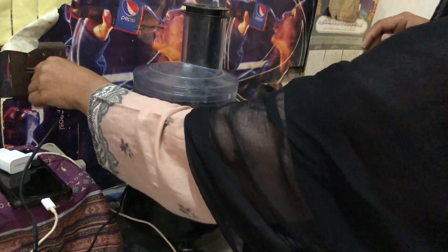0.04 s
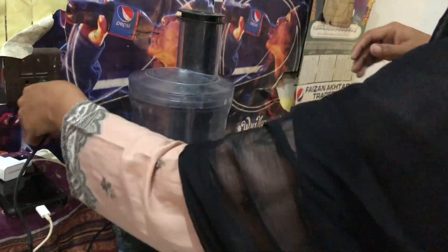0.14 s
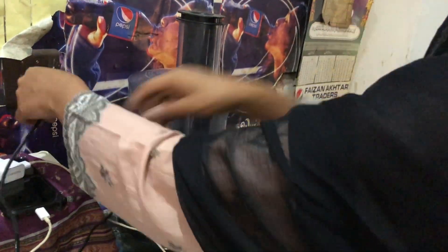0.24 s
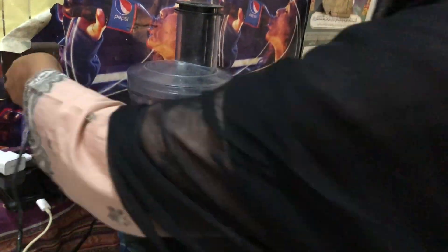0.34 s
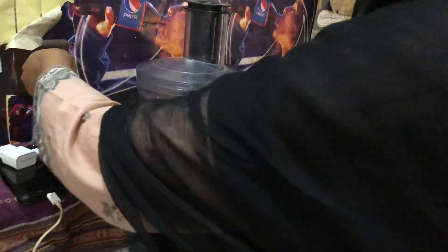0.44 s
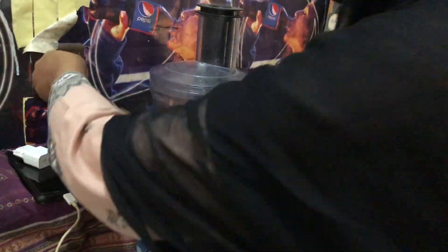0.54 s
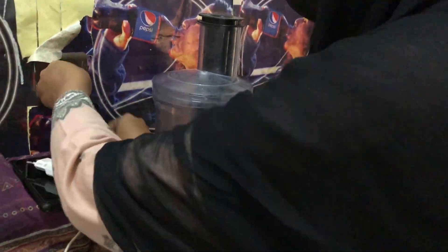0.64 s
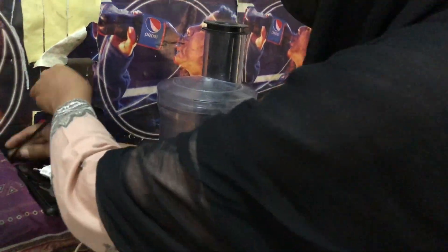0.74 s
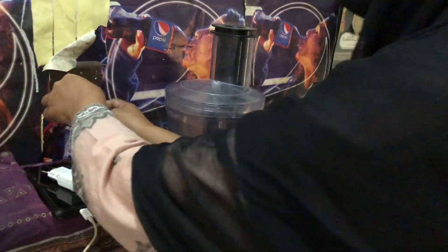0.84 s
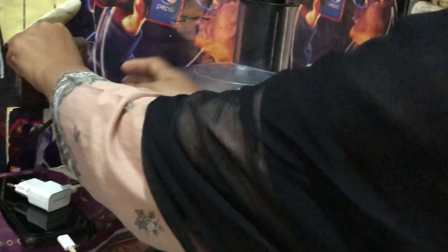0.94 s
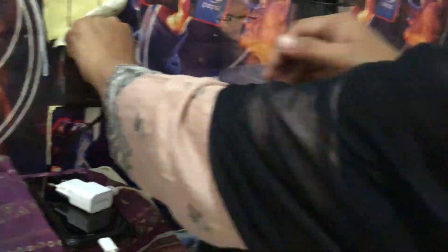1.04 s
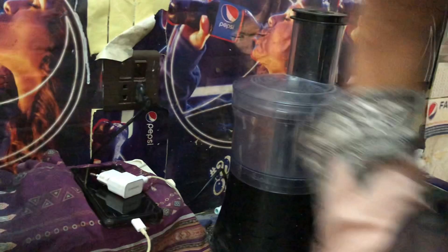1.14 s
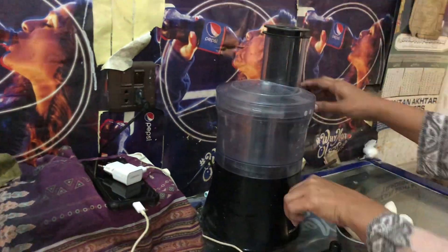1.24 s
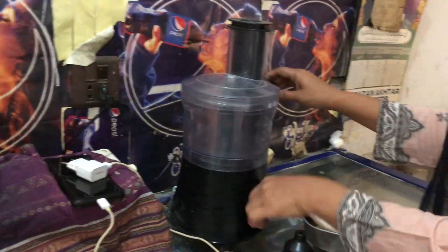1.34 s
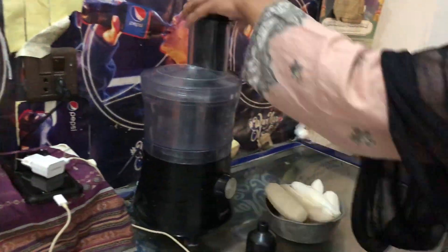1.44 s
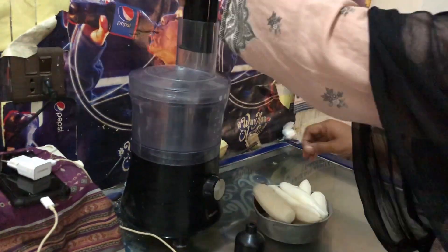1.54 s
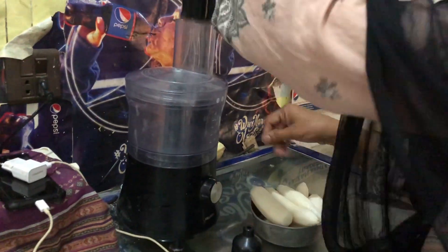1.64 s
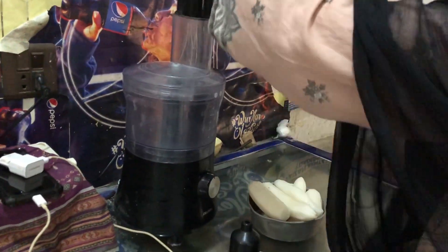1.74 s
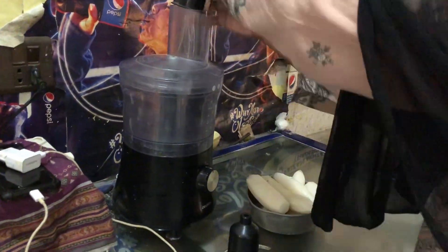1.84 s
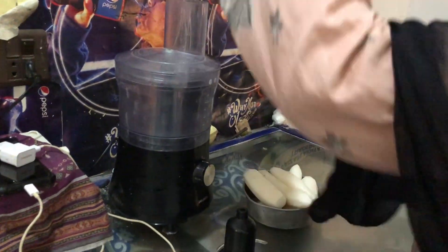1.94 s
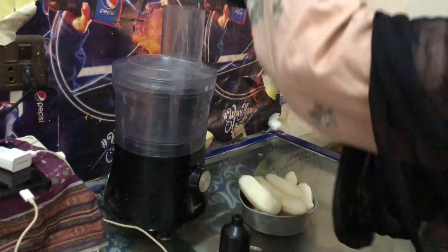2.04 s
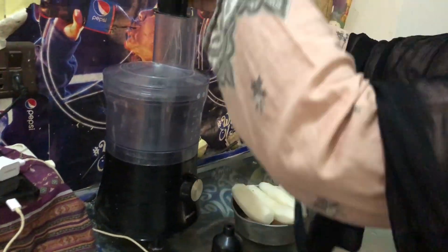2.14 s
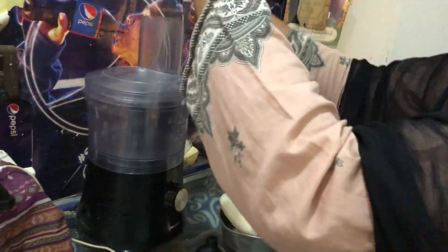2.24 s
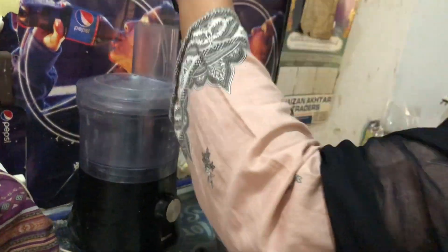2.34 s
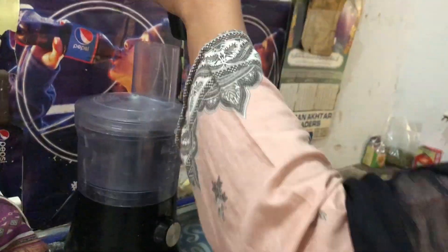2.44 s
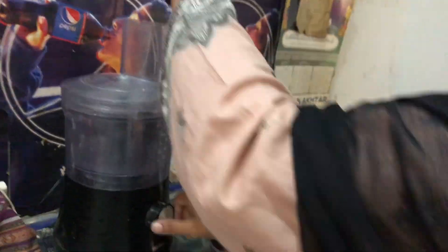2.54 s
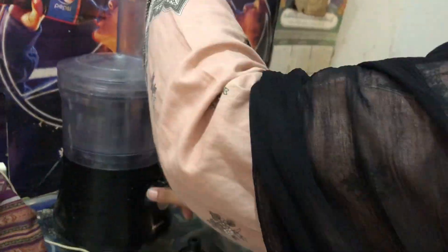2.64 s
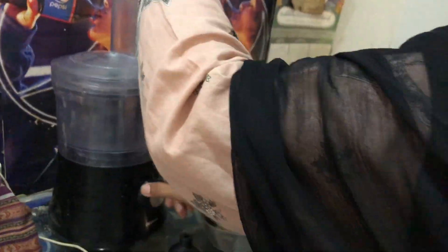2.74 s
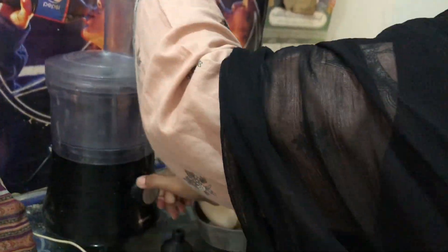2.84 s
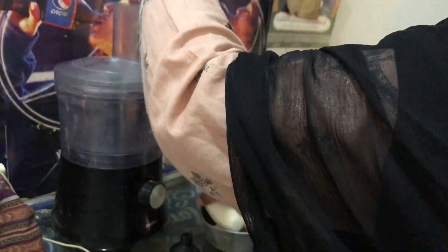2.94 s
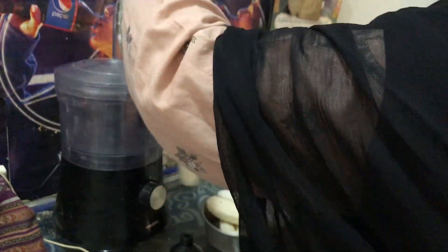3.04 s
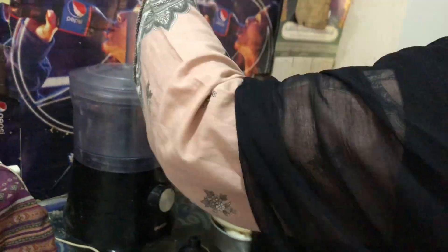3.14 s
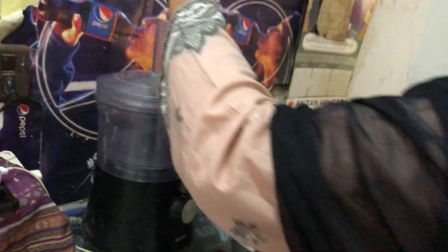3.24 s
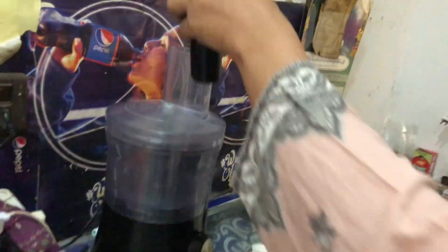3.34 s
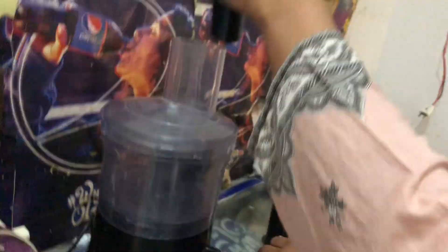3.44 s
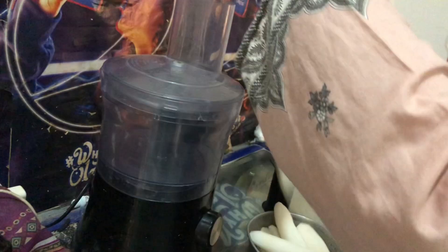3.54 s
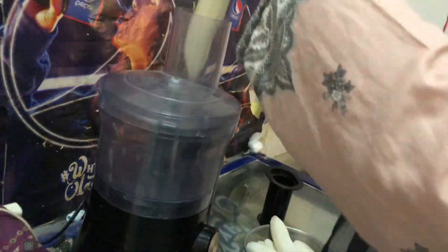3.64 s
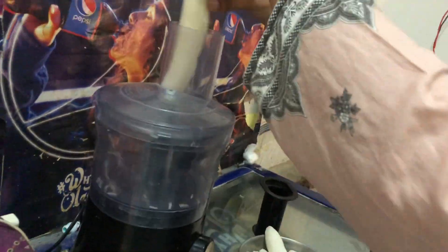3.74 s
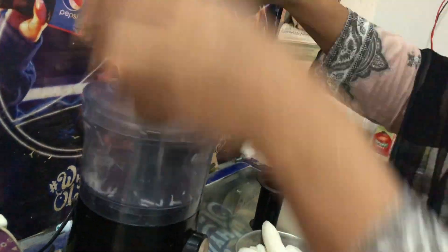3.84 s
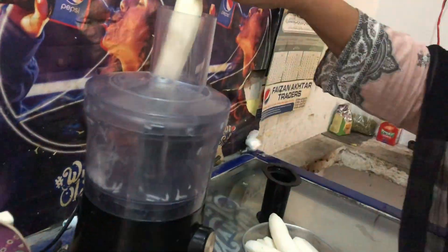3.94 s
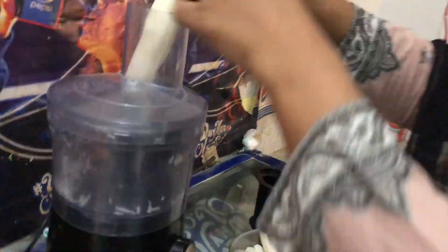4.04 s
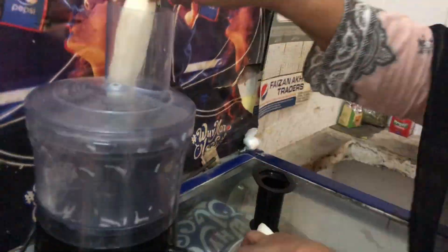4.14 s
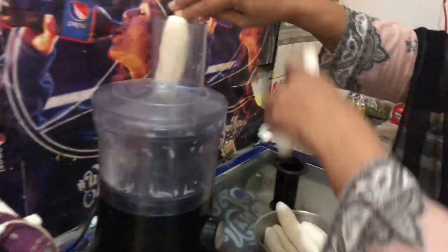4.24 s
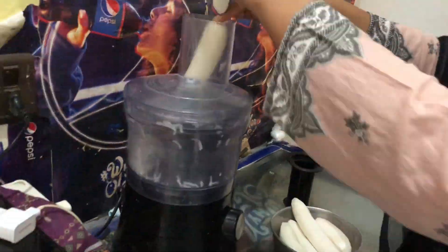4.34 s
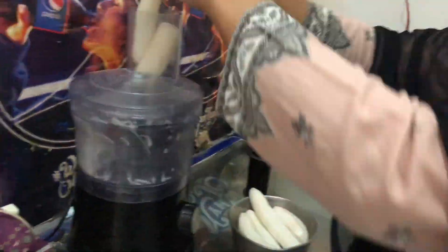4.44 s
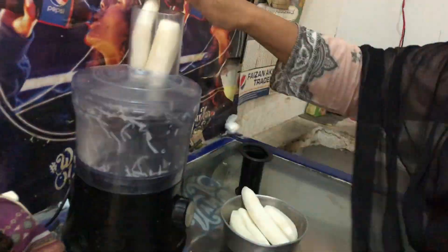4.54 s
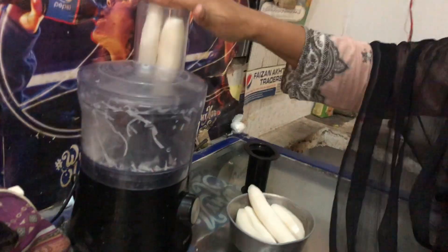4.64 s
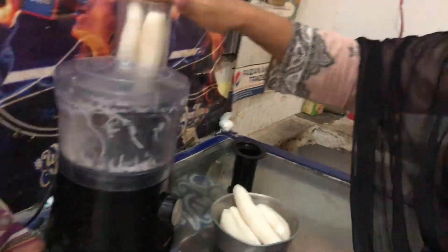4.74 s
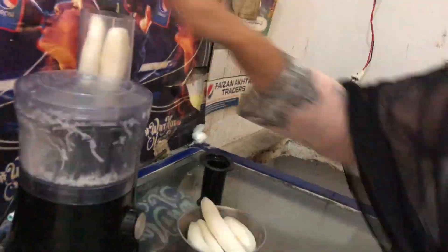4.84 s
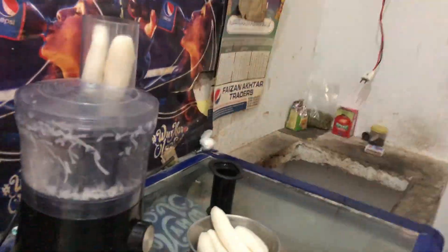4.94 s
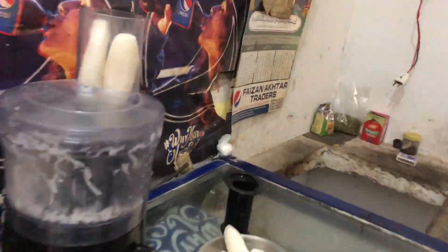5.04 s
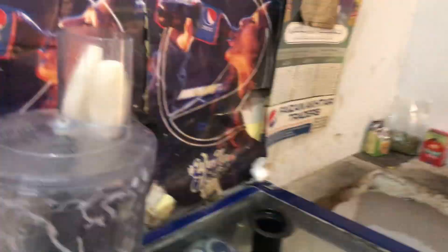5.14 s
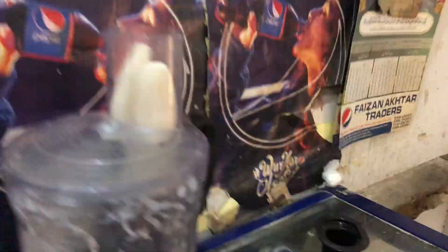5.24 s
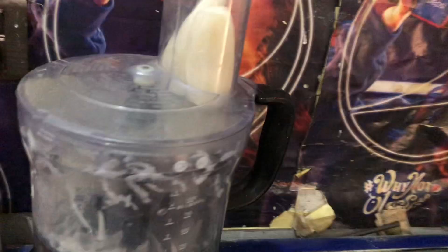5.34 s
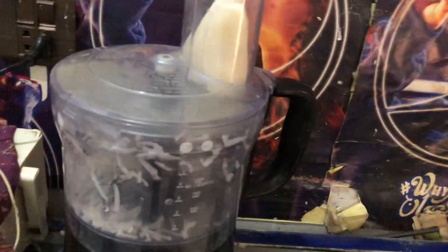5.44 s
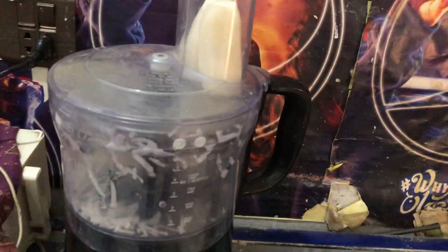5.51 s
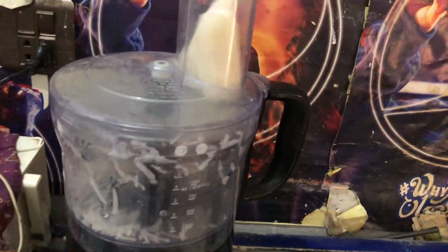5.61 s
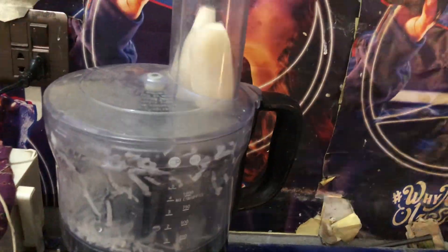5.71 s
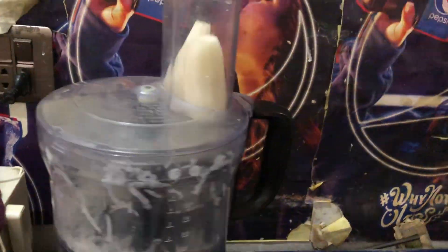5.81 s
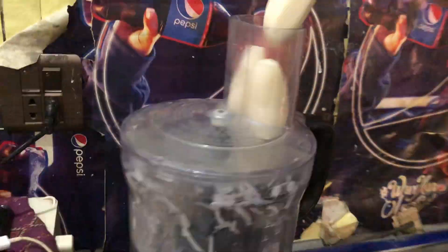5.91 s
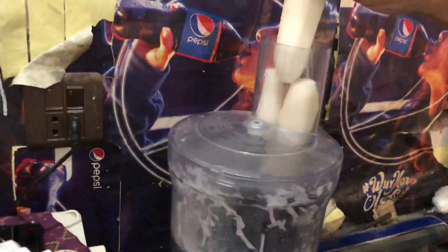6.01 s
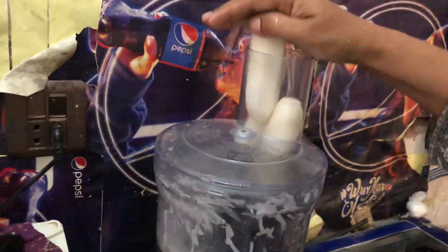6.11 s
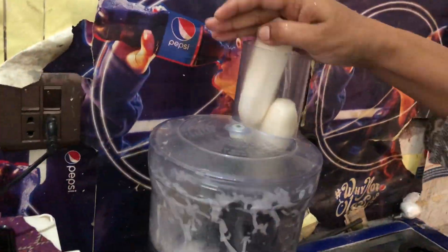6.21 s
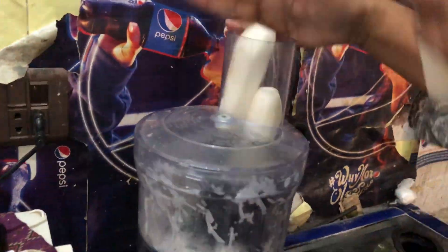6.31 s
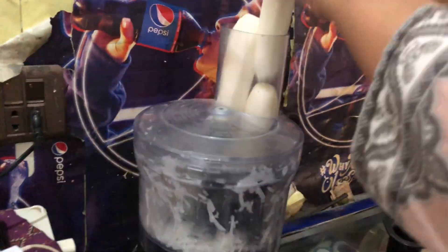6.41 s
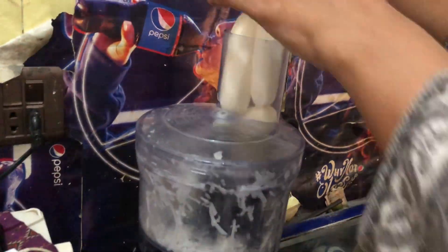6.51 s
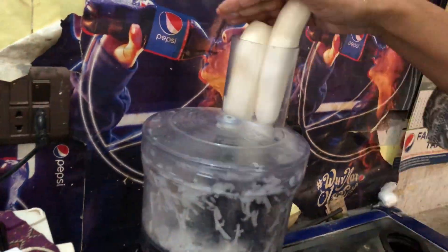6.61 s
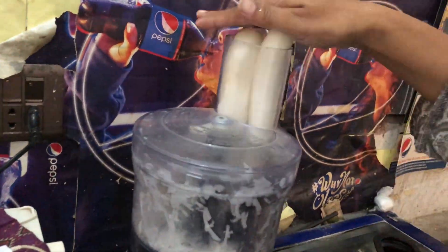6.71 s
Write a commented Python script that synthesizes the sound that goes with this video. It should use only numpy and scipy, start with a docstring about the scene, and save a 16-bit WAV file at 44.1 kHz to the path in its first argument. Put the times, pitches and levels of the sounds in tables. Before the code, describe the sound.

A hand-held microphone near the counter picks up light plastic clicks and fumbling, one quick pulse of an electric motor, and a busy cluster of sharp plastic knocks with hollow tube rubs. Just before three seconds the motor switches on for good, buzzing and hissing steadily; vegetables thump and squeak on the disc, then a rough hollow grating swells with each push, the tone turning brighter later.

```python
"""A food processor on a kitchen counter, heard from close by over the soft hiss of a quiet kitchen.
A plug clicks into its socket, the motor is pulsed once and coasts down, then the plastic pusher slides out
of the feed tube and is put down: noise bursts ring the plastic and the air in the tube.
The motor runs on to the end, with brush noise hissing and tones on multiples of its rotation whining,
while radishes knock, squeak and are shredded by the disc: grainy noise in the resonances of the bowl."""
import sys
import numpy as np
from scipy import signal
from scipy.fft import rfft, irfft, next_fast_len
from scipy.io import wavfile

SR = 44100
rng = np.random.default_rng(int(sys.argv[2]) if len(sys.argv) > 2 else 0)


def wrap_up_sound(samples):
    """Save the sound to the file named by the first command line argument, as 16-bit audio."""
    columns = np.atleast_2d(samples).T
    # keep every value between -1 and 1, then stretch to whole-number steps
    tamed = np.clip(columns, -1, 1)
    steps = np.round(tamed * 32767).astype(np.int16)
    wavfile.write(sys.argv[1], SR, steps)


N = 298557
TIME = np.arange(N) / SR
PADDED = next_fast_len(N + SR // 2)
BINS = np.maximum(np.fft.rfftfreq(PADDED, 1 / SR), 1)


def from_db(db):
    """Decibels to gain."""
    return 10 ** (np.asarray(db) / 20)


def rms_one(x):
    """Scale to rms 1."""
    return x / np.sqrt(np.mean(x ** 2) + 1e-20)


def in_time(rows):
    """Second column of a table, interpolated over time."""
    s, value = np.transpose(rows)
    return np.interp(TIME, s, value)


def since(s):
    """Seconds gone by since a moment, 0 before it."""
    return np.maximum(TIME - s, 0)


def held(start, end, attack_s, release_s, shape=1):
    """Attack, hold, release; a shape above 1 lingers, then drops faster."""
    attack = 1 - np.exp(-since(start) / attack_s)
    return attack * np.exp(-(since(end) / release_s) ** shape)


def swell(length, edge):
    """A stroke with rounded ends; edge is the share of it that is rounded."""
    return signal.windows.tukey(max(int(length * SR), 8), edge)


def add(out, s, sound):
    """Mix a sound in at a time."""
    i = max(round(s * SR), 0)
    out[i:i + len(sound)] += sound[:N - i]


def white():
    """Fresh white noise."""
    return rng.standard_normal(N)


def drift(rate):
    """Random wander with rms 1, through a fresh value rate times a second."""
    knots = rng.standard_normal(4096)
    return rms_one(np.interp(TIME * rate, np.arange(len(knots)), knots))


def grains(per_s, spread_db):
    """Random tiny impacts of uneven size; rms 1."""
    struck = rng.random(N) < per_s / SR
    sign = rng.choice([-1, 1], N)
    size = from_db(spread_db * np.minimum(rng.exponential(1, N), 4))
    return rms_one(struck * sign * size)


def band(x, low_hz, high_hz, order=2):
    """Butterworth band-pass."""
    sos = signal.butter(order, [low_hz, min(high_hz, SR / 2 - 1)], "band", fs=SR, output="sos")
    return signal.sosfilt(sos, x + 1e-18)


def coloured(x, spectrum):
    """Filter a sound by a spectrum table; rms 1."""
    hz, db = np.transpose(spectrum)
    gain = from_db(np.interp(np.log(BINS), np.log(hz), db))
    return rms_one(irfft(rfft(x, PADDED) * gain, PADDED)[:N])


def resonate(x, modes):
    """Parallel resonances, each with its own width and peak gain."""
    out = 0
    for hz, width, db in modes:
        r = np.exp(-np.pi * abs(width) / SR)
        poles = [1, -2 * r * np.cos(2 * np.pi * hz / SR), r * r]
        ring = signal.lfilter([1, 0, -1], poles, x + 1e-18)
        out = out + from_db(db) * (1 - r * r) / 2 * ring
    return out


def kitchen(x, t60, wet_db, wall_hz):
    """Dense reflections from counter and walls: decaying noise, band-limited up to wall_hz."""
    t = TIME[:SR // 3]
    tail = band(rng.standard_normal(len(t)), 156, wall_hz, order=1)
    tail = tail * from_db(-60 * t / t60) * (t > .004)
    return x + from_db(wet_db) * signal.fftconvolve(x, tail / np.linalg.norm(tail))[:len(x)]


def shifting_reflections(x):
    """Short dense reflections, drawn afresh and crossfaded every half second: the treble colour keeps shifting."""
    out, hop = np.zeros(N), SR // 2
    fade = signal.windows.hann(2 * hop, sym=False)
    for i in range(0, N, hop):
        piece = x[i:i + 2 * hop] * fade[:N - i]
        add(out, i / SR, kitchen(piece, t60=0.057, wet_db=-6.0, wall_hz=16000))
    return out


# Spectrum of the quiet kitchen. Each row: frequency in Hz, relative level in dB per Hz.
ROOM_SPECTRUM = [(24, -80), (40, -61), (194, -19), (329, -15), (382, -9.5), (529, -10), (585, -17),
                 (790, -8), (1070, -10), (1720, -1.5), (1950, -9.5), (3650, -13), (3930, -14), (14800, -25),
                 (16000, -31)]
# Its steady tones. Each row: frequency in Hz, mean level in dB before the fade.
ROOM_TONES = [(501, -57.5), (1774, -50)]


def room_tone():
    """Soft hiss with a few tones wavering in pitch and level, fainter as the listener turns away."""
    tones = 0
    for hz, db in ROOM_TONES:
        phase = 2 * np.pi * np.cumsum(hz + 4 * drift(30)) / SR
        tones = tones + from_db(db + 2 * drift(7.0)) * np.sin(phase)
    hiss = from_db(-46) * coloured(white(), ROOM_SPECTRUM)
    fade_db = np.interp(TIME, [1.0, 2.7], [0.1, -2.5])
    return (hiss + tones) * from_db(fade_db)


# Pusher and radishes slide in the tube. Each row: start in seconds, length in seconds, drive level in dB.
SLIDES = [(1.601, 0.096, -27.5), (1.85, 0.091, -29.5), (1.934, 0.075, -40), (2.618, 0.078, -42.5),
          (3.505, 0.64, -42.5)]
# Air in tube and bowl. Each row: resonance in Hz, width in Hz, gain in dB.
TUBE_AIR = [(199, 7, 4), (280, 60, -8), (395, 35, -1), (445, 35, -2), (510, 14, 5), (630, 60, -11)]


def slides():
    """Whatever slides down the hollow tube rubs it and sets the air inside ringing."""
    pressure = np.zeros(N)
    for s, length, db in SLIDES:
        add(pressure, s, from_db(db) * swell(length, 0.14))
    return from_db(13) * band(resonate(pressure * white(), TUBE_AIR), 175, 800, order=5)


def tube_hum(bowl_gain):
    """The loaded disc stirs the air in the tube into a hollow hum."""
    return from_db(-39) * bowl_gain * rms_one(band(resonate(white(), TUBE_AIR), 250, 350))


def low_rumble(bowl_gain):
    """Faint low noise below 200 Hz that follows the level of the bowl."""
    return from_db(-46.5) * bowl_gain * rms_one(band(white(), 15, 200, order=1))


# Wet and dry squeaks. Each row: start in seconds, length in seconds, start pitch in Hz, end pitch in Hz,
# level in dB, unsteadiness of pitch from 0 to 1.
SQUEAKS = [(0.219, 0.033, 1504, 1426, -34, 0.05), (0.261, 0.05, 1380, 1285, -42, 0.06),
           (1.94, 0.16, 4150, 3920, -45, 0.06), (3.277, 0.079, 2020, 2370, -23.5, 0.03),
           (3.264, 0.043, 2860, 3230, -29, 0.03), (3.29, 0.11, 1119, 1160, -24.5, 0.06),
           (4.003, 0.11, 1150, 1344, -26, 0.09), (4.005, 0.026, 2460, 2610, -16.5, 0.03),
           (4.035, 0.0145, 2590, 2526, -13, 0.01)]


def squeaks():
    """Stick-slip: short unsteady tones that glide."""
    out, unsteady = np.zeros(N), drift(700)
    for s, length, start_hz, end_hz, db, waver in SQUEAKS:
        stroke = swell(length, 0.097)
        glide = np.linspace(start_hz, end_hz, len(stroke))
        hz = glide * (1 + waver * unsteady[int(s * SR):][:len(stroke)])
        add(out, s, from_db(db) * stroke * np.sin(2 * np.pi * np.cumsum(hz) / SR))
    return out


# Fingers fumble with the parts. Each row: start in seconds, length in seconds, mean tick level in dB.
FUMBLES = [(0.497, .025, -27.5), (0.716, .03, -26.5), (2.058, .045, -29), (2.19, .03, -23)]
TICK_GAP_S, TICK_SPREAD_DB = .015, 2.5
TICK_LOW_HZ, TICK_HIGH_HZ = 1370, 4900  # centres; each tick strays up to half an octave
TICK_RING_DB, TICK_BRIGHT_DB = 14, 11


def ticks():
    """Small contacts at uneven intervals while the fingers fumble, as rows like those of CLICKS."""
    rows = []
    for s, length, db in FUMBLES:
        chance = rng.uniform(-1, 1, (8, 4))
        for k, (late, loud, low, high) in enumerate(chance):
            delay = TICK_GAP_S * (k + .5 + late / 3)
            if delay < length:
                level_db = db + TICK_SPREAD_DB * loud
                low_hz, high_hz = TICK_LOW_HZ * 2 ** (low / 2), TICK_HIGH_HZ * 2 ** (high / 2)
                rows.append((s + delay, level_db, low_hz, high_hz, TICK_RING_DB, TICK_BRIGHT_DB))
    return rows


# Plastic contacts of plug, switch and pusher. Each row: start in seconds, level in dB (rms over 0.2 s
# is 22.5 dB lower), low ring in Hz, high ring in Hz, gain of the high ring in dB, brightness in dB.
CLICKS = [(0.454, -20.5, 1770, 6040, 28, 18), (0.493, -20, 1270, 5680, 14, -11),
          (0.528, -19.5, 1370, 5990, 8, 24), (0.542, -11, 1280, 6470, 2, 1.5),
          (0.675, -18.5, 1190, 6700, -3, 8), (0.756, -24, 1300, 5340, 10, 11),
          (0.772, -20.5, 2080, 6850, 6, 15), (0.795, -16, 1230, 5500, 8, 8),
          (0.803, -16, 1040, 3580, 19, -2), (1.038, -32.5, 1780, 5310, 10, 2),
          (1.109, -15.5, 1440, 6130, 30, 15), (1.509, -12, 830, 5660, 20, 10),
          (1.542, -9.5, 1130, 5700, 20, 7), (1.652, -23, 810, 4920, 26, 3),
          (1.695, -20.5, 1180, 4860, 22, 1), (1.775, -6.5, 960, 5400, 12, -4),
          (1.781, -6, 850, 5240, 16, -6), (1.81, -11.5, 1100, 5250, 16, -3),
          (1.837, -13.5, 840, 4730, 21, -2), (1.899, -10.5, 1130, 4870, 17, 1),
          (2.136, -9, 1140, 5900, 23, 1), (2.145, -13, 810, 5310, 12, -15), (2.179, -15, 890, 5630, 14, 3),
          (2.189, -11, 1160, 5100, 9, -19), (2.252, -20, 970, 5640, 14, -12),
          (2.281, -17, 1020, 5160, 18, 1), (2.433, -4.5, 1110, 4500, 28, -4),
          (2.889, -21, 1125, 5640, 10, 22)]
# Ringing of the plastic. Each row: resonance in Hz, width in Hz, gain in dB.
PLASTIC = [(643, 10, 16.5), (845, 25, 13), (1010, 92, 1), (1080, 75, -3), (1405, 28, 9), (2014, 52, 0),
           (2930, 14, -25), (4700, 110, -23), (5200, 290, 14), (5580, 360, 20.5), (7060, 35, 6)]
CRACK_T60_S, RING_T60_S, PARTIALS_T60_S = 0.021, 0.17, .06
RING_DB, PARTIALS_DB, PARTIALS_COUNT = -14, -23, 22  # levels against the crack; dB of each partial
SPOT_WIDTH_HZ, SPOT_DB = 140, 11  # low ring of the spot struck; the high ring is twice as wide
CLACK_DB, CLACK_FOLLOWS = 4, 0.7  # mid treble of a contact, and its share of the brightness


def clicks(contacts):
    """Each contact is a sharp crack and a short ring of the plastic, with partials drawn for the spot struck."""
    out, t = np.zeros(N), TIME[:SR // 5]
    decay = from_db(-60 * t / CRACK_T60_S) + from_db(RING_DB - 60 * t / RING_T60_S)
    dying = from_db(PARTIALS_DB - 60 * t / PARTIALS_T60_S)
    for s, level_db, low_hz, high_hz, high_db, bright_db in contacts:
        faint_hz = np.geomspace(900, 13000, 2000)[rng.integers(0, 2000, (PARTIALS_COUNT, 1))]
        partials = dying * np.sin(2 * np.pi * faint_hz * t).sum(axis=0)
        force = rng.standard_normal(len(t)) * decay + partials
        spot = [(low_hz, SPOT_WIDTH_HZ, SPOT_DB), (high_hz, 2 * SPOT_WIDTH_HZ, high_db)]
        shell = force + resonate(force, list(PLASTIC) + spot)
        body = rms_one(band(shell, 700, 2700, order=4))
        clack = rms_one(band(shell, 2500, 6600, order=3))
        tick = rms_one(band(shell, 6800, 15000))
        hit = body + from_db(CLACK_DB + CLACK_FOLLOWS * bright_db) * clack + from_db(bright_db) * tick
        add(out, s, from_db(level_db - 22.5) * rms_one(hit))
    return out


# Speed once the motor is up, sagging under load. Each row: time in seconds, pitch of its pinion in Hz.
CRUISE = [(3.45, 3500), (3.73, 3600), (3.92, 3490), (4.35, 3500), (4.46, 3620), (4.65, 3630), (4.77, 3550),
          (4.9, 3680), (5.27, 3745), (5.48, 3835), (6.05, 3850), (6.25, 3700), (6.5, 3728), (6.77, 3600)]
# A short pulse of the switch, then a run past the end. Each row: on in seconds, off in seconds,
# jolt of the bowl in dB before its attack and release.
RUNS = [(1.112, 1.343, -30), (2.889, 6.9, -17.5)]
SPIN_UP_S, SPIN_UP_SHAPE, COAST_S = .05, .65, .125  # gathers speed fast, then ever more slowly


def whine_pitch():
    """The motor spins up when switched on and coasts down when let go; pinion pitch in Hz."""
    share = 0
    for on, off, _ in RUNS:
        spin_up = 1 - np.exp(-(since(on) / SPIN_UP_S) ** SPIN_UP_SHAPE)
        share = share + spin_up * np.exp(-since(off) / COAST_S)
    return share * in_time(CRUISE)


# Radishes are pushed or bite harder. Each row: start in seconds, length in seconds,
# load in dB before attack and release.
PUSHES = [(3.794, 0.062, -1), (3.96, 0.092, -3.5), (4.153, 0.099, -0.5), (4.55, 0.048, -3),
          (6.075, 0.096, -1), (6.363, 0.066, -3), (6.502, 0.13, -2.5), (6.7, 0.018, 5)]
PUSH_ATTACK_S, PUSH_RELEASE_S = 0.016, 0.065
FEED_START_S, FEED_DB = 3.69, -5  # radishes rest on the disc under their own weight


def disc_load():
    """Weight of the radishes plus each push, summed as powers; about 1 at full load."""
    resting = from_db(FEED_DB) * (1 - np.exp(-since(FEED_START_S) / PUSH_ATTACK_S))
    power = resting ** 2
    for s, length, db in PUSHES:
        power = power + (from_db(db) * held(s, s + length, PUSH_ATTACK_S, PUSH_RELEASE_S)) ** 2
    return np.sqrt(power)


# The listener moves round the machine. Each row: time in seconds, share of the front sound from 0 to 1.
FRONT = [(4.6, 0), (5.0, 0.17), (5.4, 0.8), (5.95, 0.9), (6.2, 0.1), (6.77, 0.3)]
BRUSH_DB, BRUSH_FRONT_DB = -12.19, 1.14  # from the side; change heard from the front
BRUSH_ATTACK_S, BRUSH_FADE_S, BRUSH_FADE_SHAPE = 0.02, 0.067, 1.75
GEAR_DB, GEAR_LOAD_DB = -22.5, 3  # running free; change at full load
GEAR_ATTACK_S, GEAR_FADE_S, GEAR_FADE_SHAPE = 0.0042, 0.099, 1.18
BOWL_IDLE_DB, BOWL_LOAD_DB = -31, -19  # part from the free disc; part from full load
JOLT_ATTACK_S, JOLT_RELEASE_S = 0.012, 0.025


def drive():
    """Gains of bowl, gears and brushes: all follow the switch; load makes bowl and gears louder."""
    load = disc_load()
    turning, sparking, jolts = 0, 0, 0
    for on, off, jolt_db in RUNS:
        turning = turning + held(on, off, GEAR_ATTACK_S, GEAR_FADE_S, GEAR_FADE_SHAPE)
        sparking = sparking + held(on, off, BRUSH_ATTACK_S, BRUSH_FADE_S, BRUSH_FADE_SHAPE)
        jolts = jolts + from_db(jolt_db) * held(on, on, JOLT_ATTACK_S, JOLT_RELEASE_S)
    bowl = np.hypot(from_db(BOWL_IDLE_DB) * turning, from_db(BOWL_LOAD_DB) * load) + jolts
    gear = turning * from_db(GEAR_DB + GEAR_LOAD_DB * np.minimum(load, 1))
    brush = sparking * from_db(BRUSH_DB + BRUSH_FRONT_DB * in_time(FRONT))
    return bowl, gear, brush


# Resonances that the motor housing adds. Each row: resonance in Hz, width in Hz, gain in dB.
HOUSING = [(1338, 19, 16), (1448, 14, 17), (1927, 12, 1), (2305, 60, 3), (2532, 12, 4), (2870, 17, 0),
           (7200, 250, -1.5), (8160, 90, 1.5), (10830, 120, -2)]


def radiated(force, side, front):
    """The small housing rings and gives off no bass; its colour changes as the listener moves round it."""
    share = in_time(FRONT)
    shell = band(force + resonate(force, HOUSING), 250, 20400)
    return (1 - share) * coloured(shell, side) + share * coloured(shell, front)


# Brush colour from the side and from the front. Each row: frequency in Hz, relative gain in dB.
BRUSHES_SIDE = [(2650, -28), (4500, -8.5), (5620, 0), (6630, -5), (7180, 0.5), (7730, 0.5), (8240, 0.5),
                (8690, -7.5), (9160, -4), (9870, -5.5), (10600, 0), (11700, 0), (12800, 4), (14500, 0),
                (16000, -6)]
BRUSHES_FRONT = [(2650, -29), (4500, -26.5), (5140, 3), (5650, -13), (6060, 1), (6630, 0.5), (7180, 4),
                 (8030, 3.5), (8550, -0.5), (9410, -3.5), (10600, 5), (11400, 1), (13300, 8.5),
                 (15100, 3.5), (16000, 3.5)]


def brushes(turns, top_db=-1.01, ripple=0.084):
    """Carbon brushes scrape and spark over the commutator, harder once a turn."""
    sparks = white() + .4 * grains(12000, 2)
    force = sparks * (1 + ripple * np.cos(2 * np.pi * turns))
    hiss = radiated(force, BRUSHES_SIDE, BRUSHES_FRONT)
    high_pass = signal.butter(6, 9500, "high", fs=SR, output="sos")
    top = signal.sosfiltfilt(high_pass, hiss)
    top_power = from_db(top_db) ** 2  # the rest of the power lies below 9.5 kHz
    return np.sqrt(top_power) * rms_one(top) + np.sqrt(1 - top_power) * rms_one(hiss - top)


def empty_bowl_drone():
    """The motor shakes the bowl even when it is empty; weaker from the front."""
    ring = resonate(white(), [(398.0, 10, -12.5), (511.0, 2.4, 2.5)])
    return from_db(-17.5 - 38.0 * in_time(FRONT)) * rms_one(band(ring, 377, 544))


# How well the housing passes the whine. Each row: pitch in Hz, relative level in dB.
WHINE = [(800, -24), (1600, -16), (2000, -8), (2200, -16), (2700, -12), (3030, -8), (3200, -19),
         (3500, -15.5), (3620, -12.5), (3730, -14), (3850, -20)]
# Other tones of the motor. Each row: multiple of the rotation, relative level from the side in dB,
# relative level from the front in dB.
MOTOR_TONES = [(2, -44, -25), (3, -41, -33), (24, -32, -11.5)]
PINION_TEETH = 23


def motor_song(turns, whine_hz):
    """Pinion, commutator and imbalance sing on multiples of the rotation, each flickering in level."""
    front = in_time(FRONT)
    whine_db = np.interp(whine_hz, *np.transpose(WHINE)) + 1.7 * drift(60)
    song = from_db(whine_db) * np.sin(2 * np.pi * PINION_TEETH * turns)
    for multiple, side_db, front_db in MOTOR_TONES:
        tone_db = side_db + (front_db - side_db) * front + drift(51)
        song = song + from_db(tone_db) * np.sin(2 * np.pi * multiple * turns)
    return from_db(3) * song


# Gear colour from the side and from the front. Each row: frequency in Hz, relative gain in dB.
GEARS_SIDE = [(710, -58), (1200, 0), (1440, -7), (1600, 2.5), (1760, 10), (2010, 5.5), (2140, 3), (2310, 6),
              (2490, 1), (2920, 2), (3310, -4), (3600, 4), (4030, 4), (4570, 2), (5000, 7), (6500, 6),
              (11000, -120)]
GEARS_FRONT = [(710, -35), (1200, -3), (1480, -6.5), (1590, -10), (1740, 13), (1870, 4.5), (1990, 8),
               (2040, -6), (2330, 1), (3010, 1), (3290, -4.5), (3640, -4), (3890, 0.5), (4490, 1.5),
               (5000, -3), (6500, 7), (11000, -120)]


def gears(turns, whine_hz):
    """Teeth rattle in the housing under the song of the motor and the drone of the bowl."""
    rattle = radiated(white() + grains(3000, 1.7), GEARS_SIDE, GEARS_FRONT)
    return 0.9 * rattle + motor_song(turns, whine_hz) + empty_bowl_drone()


# Radishes meet the disc. Each row: start in seconds, drive level in dB, 60 dB decay time in seconds.
KNOCKS = [(3.128, -12.5, 0.19), (3.147, -21, 0.11), (3.411, -11, 0.073), (3.435, -16, 0.13),
          (4.006, -12.5, 0.049)]
# Bowl and lid, for the knocks and the grating. Each row: resonance in Hz, width in Hz, gain in dB.
BOWL = [(340, 16, -25), (421, 8, -11.5), (441, 19, -13), (505, 11.4, -3.5), (626, 1.1, 3), (705.6, 7.8, 2),
        (825, 20.3, 6), (899.5, 29, 4.5), (983, 67, 1.5), (1093, 24.5, 3), (1296, 21, -13), (1303, 73, -15),
        (1465, 23, -6)]


def knocks():
    """A radish hits the spinning disc and judders on it: decaying noise through the bowl."""
    force, t = np.zeros(N), TIME[:SR // 4]
    for s, db, t60 in KNOCKS:
        add(force, s, from_db(db - 60 * t / t60))
    shake = white()
    ring = rms_one(band(resonate(shake, BOWL), 350, 3300))
    judder = from_db(-4.5) * rms_one(band(shake, 1134, 2200))
    return band(force * (ring + judder), 380, 5000, order=4)


def grating(turns, chop=0.14, gear_ratio=2.6):
    """The disc's teeth tear off shreds in quick bursts that shake the bowl, one burst a turn of the disc."""
    bursts = 1 + chop * np.cos(2 * np.pi * turns / gear_ratio)
    shreds = .5 * white() + grains(900, 2.93)
    force = shreds * bursts * from_db(0.17 * drift(40))
    return from_db(-0.48) * rms_one(band(resonate(force, BOWL), 372, 1580, order=4))


def scene():
    """Room, handling and machine, the same in both ears."""
    bowl, gear, brush = drive()
    whine_hz = whine_pitch()
    rotation_hz = whine_hz / PINION_TEETH * (1 + .0008 * drift(30))
    turns = np.cumsum(rotation_hz) / SR
    contacts = clicks(list(CLICKS) + ticks())
    handling = kitchen(slides() + squeaks() + contacts + knocks(), t60=0.1, wet_db=-10.0, wall_hz=5700)
    machine = low_rumble(bowl) + tube_hum(bowl)
    machine += shifting_reflections(brush * brushes(turns))
    machine += gear * gears(turns, whine_hz)
    machine += bowl * grating(turns)
    return np.tile(room_tone() + handling + machine, (2, 1))


def record(dry):
    """The highest peaks clip and the treble above 15.85 kHz is cut."""
    low_pass = signal.ellip(12, .1, 80, 15850, fs=SR, output="sos")
    return signal.sosfilt(low_pass, np.clip(dry, -1, 1))


dry = scene()
out = record(dry)
wrap_up_sound(out)
```